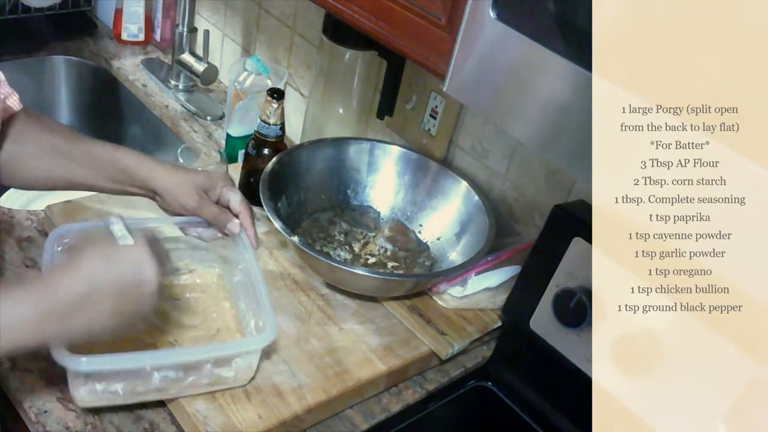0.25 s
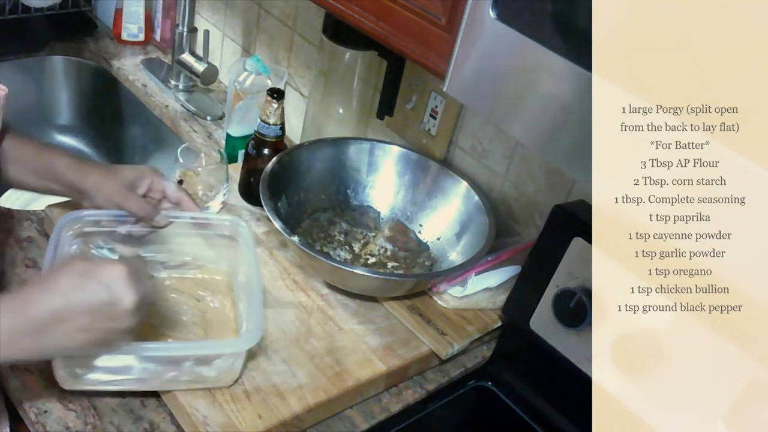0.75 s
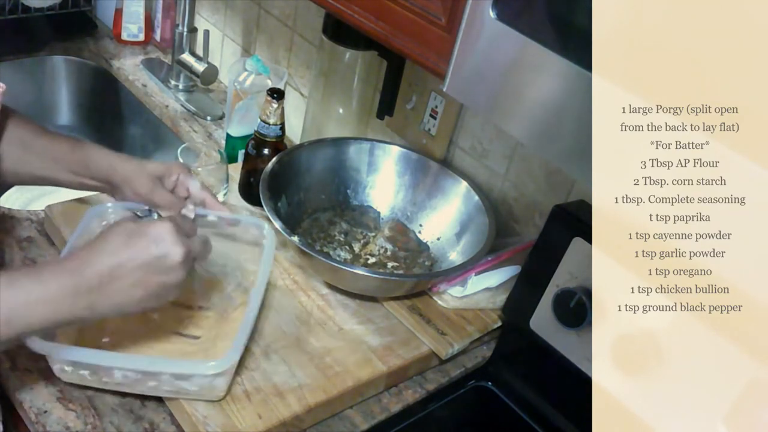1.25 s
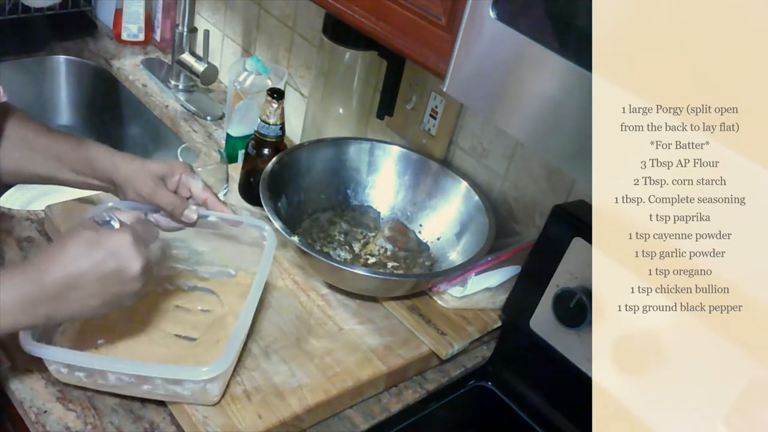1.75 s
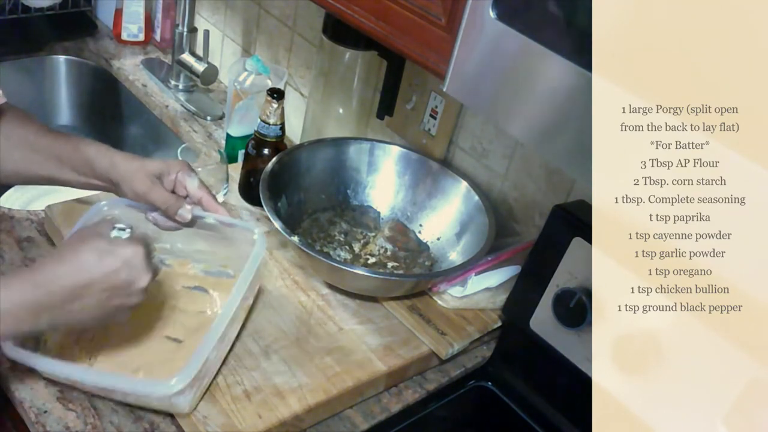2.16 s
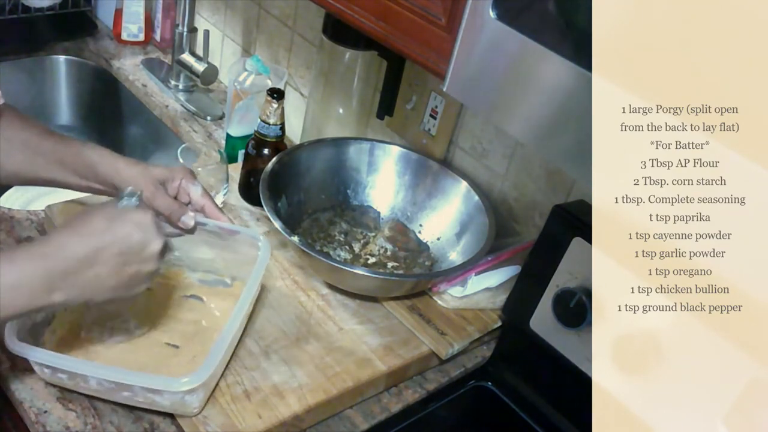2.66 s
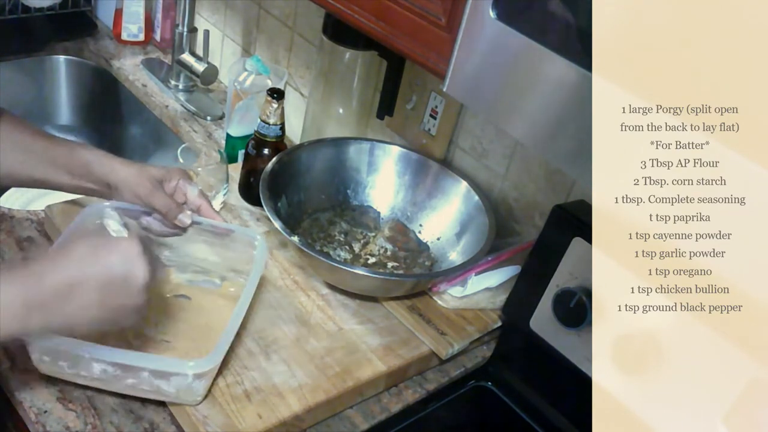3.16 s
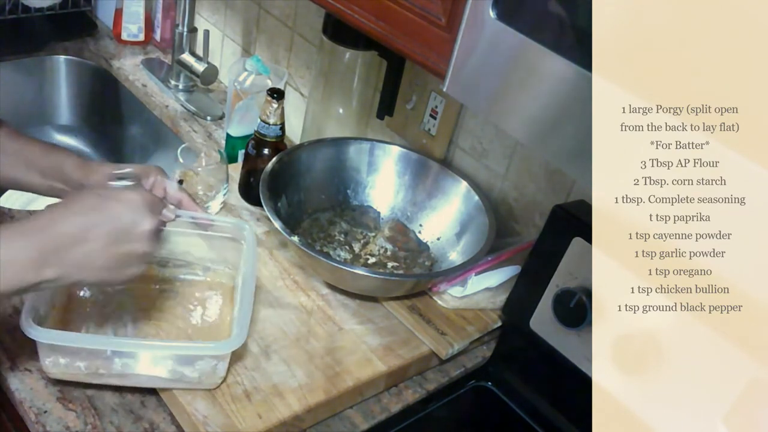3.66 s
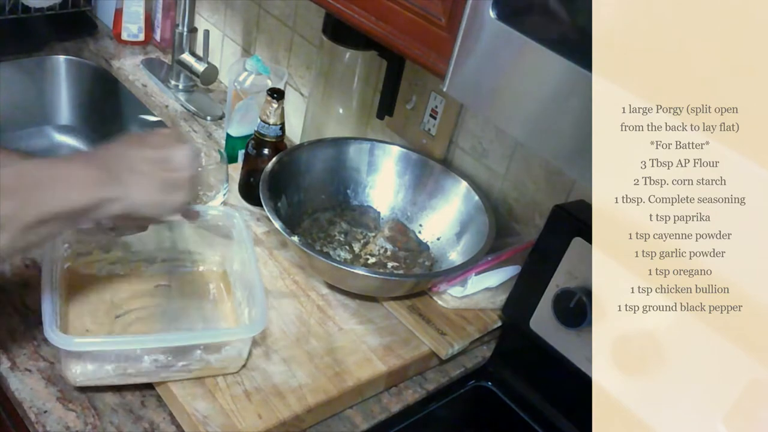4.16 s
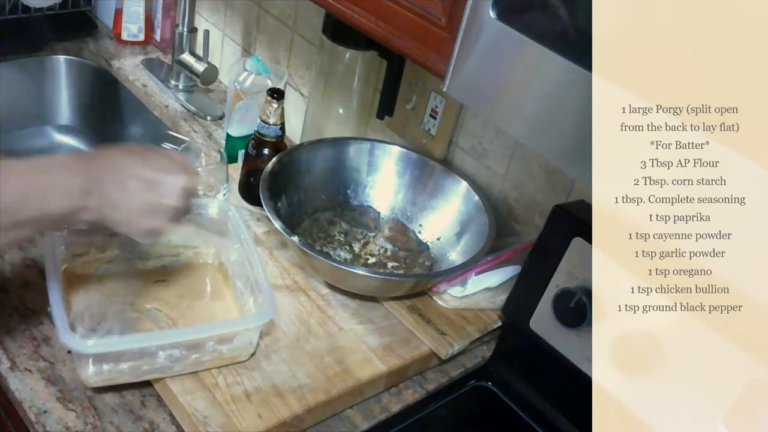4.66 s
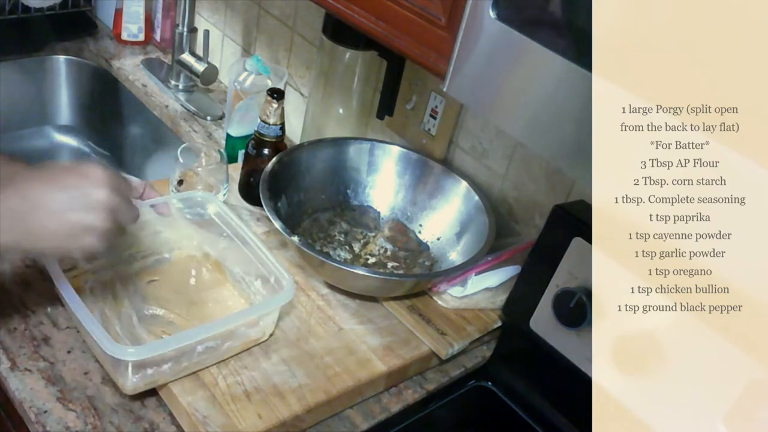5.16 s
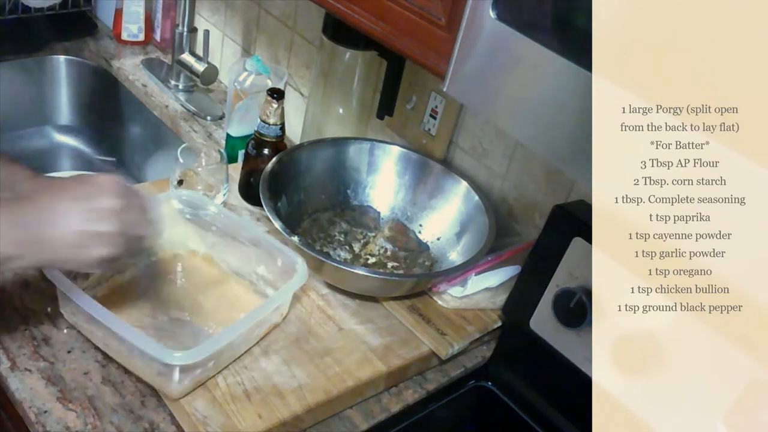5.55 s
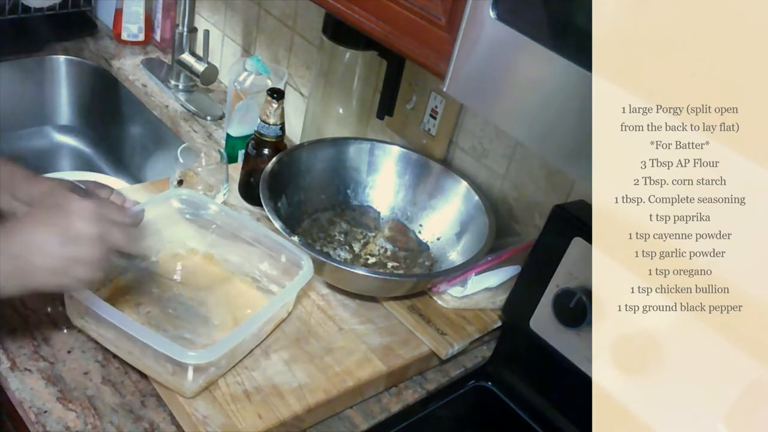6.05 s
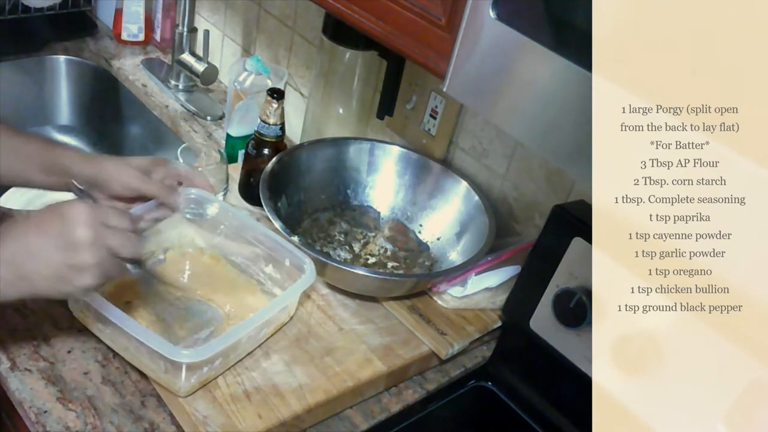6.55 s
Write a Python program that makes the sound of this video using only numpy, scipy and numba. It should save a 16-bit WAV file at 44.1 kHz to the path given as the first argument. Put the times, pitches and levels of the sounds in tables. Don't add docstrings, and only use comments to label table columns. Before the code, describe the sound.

A metal wire whisk beats thick wet batter in a thin plastic tub, heard very close in a small tiled kitchen with a steady low hum. From 0 to 1.8 s uneven hollow knocks come quickly, strong near 0.15, 0.97 and 1.35 s, with wire rattle, scraping, squelching and dull thumps of the tub on a wooden board. At about 1.87 s one very loud, sharp clack rings the plastic, with a rebound and another knock at 2.0 s. After a brief lull, firm double blows land near 2.5 s, and a wiry tick at 2.9 s. From 3 to 3.9 s it is quieter, mostly soft rubbing and small nudges. Hard clatters return at 4.37, 4.7, 4.87 and 5.1 s. From 5.3 s to about 6.8 s lighter taps, ticks and wet hissing swishes fade toward gentle stirring. Short hard-walled echo; bandlimited microphone, no high sparkle.

```python
import sys
import numpy as np
from scipy import signal
from scipy.fft import rfft, irfft, next_fast_len
from scipy.io import wavfile
from scipy.ndimage import uniform_filter1d
from numba import njit

SR = 44100
rng = np.random.default_rng(int(sys.argv[2]) if len(sys.argv) > 2 else 0)


def put_to_file(sound):
    columns = np.atleast_2d(sound).T
    safe = np.clip(columns, -1, 1)
    whole_steps = np.round(safe * 32767)
    wavfile.write(sys.argv[1], SR, whole_steps.astype(np.int16))


def convert_level_to_amplitude(level_db):
    exponent = np.asarray(level_db, float) / 20
    return 10 ** exponent


N = 300401


def level(x, db):
    return x * convert_level_to_amplitude(db) / np.sqrt(np.mean(x ** 2))


def coloured(x, shape):
    hz, db = np.transpose(shape)
    size = next_fast_len(len(x), real=True)
    f = np.fft.rfftfreq(size, 1 / SR) + 1
    gain = convert_level_to_amplitude(np.interp(np.log(f), np.log(hz), db, left=-80, right=-80))
    return level(irfft(rfft(x, size) * gain, size)[:len(x)], 0)


def walk(rate):
    k = int(SR / rate)
    steps = np.repeat(rng.standard_normal(N // k + 1), k)
    return 1.5 * uniform_filter1d(uniform_filter1d(steps, k), k)[:N]


def grains(rate, spread_db):
    clicks = rng.random(N) < rate / SR
    size = convert_level_to_amplitude(spread_db * np.minimum(rng.exponential(size=N), 3))
    return rng.standard_normal(N) * (0.16 + clicks * size)


def decay(t, t60):
    return np.exp(-np.log(1000) * t / t60)


def add(out, s, sound, peak_db):
    i = int(s * SR)
    out[i:i + len(sound)] += (sound * convert_level_to_amplitude(peak_db) / np.abs(sound).max())[:N - i]


@njit
def ring(force, hz, t60, gain):
    out = np.zeros(len(force))
    for m in range(len(hz)):
        p, z = np.exp(2j * np.pi * hz[m] / SR - np.log(1000) / (t60[m] * SR)), 0j
        for i in range(len(force)):
            z = z * p + force[i] + 1e-18
            out[i] += gain[m] * z.imag
    return out


# f/Hz, level/dB per Hz
ROOM_HUM = [(15, -24.5), (25, 0.5), (215, 2), (295, 7), (435, -5), (610, 0), (705, -18.5), (796, -4),
            (943, -5.5), (2610, -17), (4660, -30.5), (7200, -17.5), (8130, -53), (10600, -92),
            (17900, -120)]


def room_air():
    return coloured(rng.standard_normal(N), ROOM_HUM) * convert_level_to_amplitude(-55 + 0.5 * walk(2.0))


# t/s, effort/dB, wetness/dB
STIRRING = [(0, -47, -14.5), (.62, -55, -4), (1.209, -47, -13), (1.349, -39.5, -19.5),
            (1.521, -56.5, -11.5), (1.8, -40, -23.5), (2.05, -47, -4.5), (2.43, -61, -20.5),
            (2.85, -50.5, -8.5), (3.5, -53, -11.5), (3.9, -58.5, -6.5), (4.5, -48.5, -17),
            (4.8, -45, -18.5), (5.199, -49, -10), (5.5, -48, -11), (5.85, -51.5, -6), (6.2, -54, -4),
            (6.81, -57.5, -5)]
# f/Hz, level/dB, t60/s
TUB_MODES = [(120, -17, 0.26), (172, -17.5, 0.11), (214, -12, 0.36), (266, 3, 0.034), (301.8, -0.5, 0.16),
             (361.6, 0, 0.12), (408.3, -15.5, 0.44), (441, -5, 0.028), (491.5, -5.5, 0.29),
             (555.7, 0.5, 0.098), (612.7, 2.5, 0.14), (666.5, -2.5, 0.16), (763, 4.5, 0.039),
             (826, -2, 0.081), (889, -6, 0.066), (1002, -8.5, 0.14), (1101, -2.5, 0.12), (1188, -4, 0.084),
             (1140, -31.5, 0.1), (1373, -9.5, 0.077), (1500, -8.5, 0.093), (1608, -8, 0.024),
             (1814, -7, 0.016), (1970, -27.5, 0.03), (2120, -15.5, 0.029), (2395, -27.5, 0.077),
             (2590, -15, 0.04), (3020, -28, 0.13), (3354, -19, 0.039)]
# f/Hz, level/dB per Hz
SQUELCH_COLOUR = [(530, -37.5), (900, -10), (1060, 2.5), (1290, -2.5), (1960, -0.5), (3190, -5.5),
                  (4450, -13.5), (5500, -40), (7150, -55.5), (12100, -120)]
# f/Hz, level/dB per Hz
HISS_COLOUR = [(2940, -33.5), (5000, -8.5), (5900, -0.5), (7150, 10.5), (7680, 1.5), (8000, -30.5),
               (8130, -56), (10600, -38), (17900, -120)]


def stirring():
    wake_db, wake_s = -24.5, 0.015
    times, effort, wetness = np.transpose(STIRRING)
    now = np.arange(N) / SR
    wet_db = np.interp(now, times, wetness)
    drag = convert_level_to_amplitude(np.interp(now, times, effort))
    wake = np.exp(-np.arange(SR // 2) / SR / wake_s)
    for s, peak_db, *_ in all_blows():
        add(drag, s, wake, peak_db + wake_db)
    drag = uniform_filter1d(drag, SR // 200, origin=SR // 400 - 1)
    rub_db = 20 * np.log10(drag) - 1.5
    hiss_db = -57.5 + 0.87 * (rub_db + 53.5) + wet_db
    hz, db, t60 = np.transpose(TUB_MODES)
    surge = walk(15)
    rub = level(ring(grains(250, 5.75), hz, 1.0 * t60, convert_level_to_amplitude(db)), 0)
    rub = rub * convert_level_to_amplitude(rub_db + 1.02 * surge + 3.52 * walk(30))
    squelch = coloured(grains(900, 2.9), SQUELCH_COLOUR)
    squelch = squelch * convert_level_to_amplitude(rub_db + wet_db + 1.5 * surge + 2.5 * walk(35))
    hiss = coloured(grains(1500, 3.23), HISS_COLOUR) * convert_level_to_amplitude(hiss_db + 1.0 * surge + 2.0 * walk(45))
    return rub + squelch + hiss


# t/s, peak level/dB, f/Hz, t60/s
WIRE_PINGS = [(0.028, -48, 1420, 0.15), (0.56, -52, 1790, .1), (1.876, -12.5, 1122, 0.049),
              (1.877, -11.5, 469, 0.11), (1.877, -22.5, 2170, .04), (1.879, -23, 1400, .04),
              (1.95, -33, 1114, .07), (2.012, -20, 770, 0.098), (4.371, -22.5, 1196, 0.11),
              (4.4, -30, 1157, 0.14), (4.48, -48.5, 1130, 0.11), (4.312, -40, 775, 0.14),
              (.98, -20, 571, 0.14), (.842, -28, 517, .12), (4.866, -17.5, 713, 0.12),
              (5.571, -28.5, 705, .05), (.164, -15.5, 620, 0.042), (5.094, -18.5, 721, 0.055),
              (5.661, -25, 2010, 0.022), (3.078, -42, 1460, 0.091), (3.889, -54, 3240, 0.12),
              (5.208, -49, 1260, 0.067), (5.252, -40.5, 1220, 0.11), (5.41, -51.5, 2620, 0.076),
              (5.502, -48, 3390, .08), (5.788, -47, 2830, 0.054), (5.831, -47, 3150, .1),
              (5.846, -44.5, 3110, 0.089), (5.85, -51, 2120, 0.078), (6.077, -45.5, 2867, .1),
              (6.108, -52, 2680, .1)]


def pings():
    warble, rough_db = 0.03, 3.5
    out, t = np.zeros(N), np.arange(SR // 6) / SR
    wander = walk(120)
    bend = 1 + warble * wander
    for s, peak_db, hz, t60 in WIRE_PINGS:
        i = int(s * SR)
        turns = np.cumsum(hz * bend[i:][:len(t)]) / SR
        rough = convert_level_to_amplitude(rough_db * wander[::-1][i:][:len(t)])
        shape = (1 - np.exp(-t / 0.00095)) * decay(t, t60)
        add(out, s, rough * np.sin(2 * np.pi * turns) * shape, peak_db)
    return out


# t/s, peak level/dB, thud below 400 Hz/dB, upper wall modes/dB, bright edge/dB
HARD_KNOCKS = [(0.107, -17, -19, -5.5, -51), (0.164, -12.5, 3, 14.5, -15), (0.525, -22.5, -9, 0, 8.5),
               (0.837, -22.5, -16, -18, -5.5), (0.964, -11, -5, -16, -14), (1.052, -14.5, 13, 8.5, -17),
               (1.324, -14.5, -1, 7, -24), (1.35, -16.5, -1, 1, -28), (1.384, -17.5, -19.5, 12, -16),
               (1.676, -15, -4, -13, -20), (1.769, -22.5, -5, -3, -31.5), (1.874, 3.5, -21, -1.5, -27.5),
               (2.012, -12, -5.5, -7, 0.5), (2.506, -9.5, -7, -11, -20.5), (2.572, -14, -9, -4, -16),
               (2.844, -20, -2, -5, -5), (3.955, -22, -3, -3, -10), (4.369, -12.5, -9, 9, -19),
               (4.688, -11.5, -13.5, -12, -18), (4.866, -10.5, -7.5, 7.5, -18),
               (5.094, -11, -9.5, -10, -36), (5.571, -22.5, -23, -22, -42), (5.654, -23.5, -11, 9, 6),
               (5.661, -27.5, -24, -3, 20), (5.804, -27, -17, -13, -24)]
# t/s, peak level/dB, thud/dB, bright edge/dB
LIGHT_TAPS = [(0.316, -24, -8, -6), (0.608, -27.5, -12, -14), (0.636, -24, -16, -11.5),
              (0.788, -25, 6.5, -14), (1.063, -16.5, -10, -24), (1.107, -19.5, -32, -9.5),
              (1.272, -23.5, 1, -34), (1.459, -29.5, -18, -7), (1.506, -28.5, 7, -13),
              (1.745, -25.5, -2, -11), (1.827, -21.5, -9, -22.5), (2.778, -35, 7, -23.5),
              (2.887, -21.5, -22, -7), (3.07, -36, -22, -8), (3.33, -42.5, -17, -33), (3.427, -28.5, -5, 1),
              (4.14, -28, -11, -30), (4.291, -29.5, -17, -9), (4.629, -30.5, -3, -32),
              (4.801, -30, -18, -31), (5.331, -25.5, 10, -3.5), (5.344, -24, -9, -7),
              (5.614, -28.5, -1, -22), (5.761, -33.5, -5, -4), (5.999, -28.5, -11, -4),
              (6.076, -29, 2, 4.5), (6.213, -29, -1, 3.5), (6.411, -24.5, 0, 0.5), (6.504, -27, -1.5, -1),
              (6.698, -33, 4, -15)]
# t/s, peak level/dB
TUB_NUDGES = [(0.029, -47), (0.245, -35), (0.487, -49), (0.7, -41), (1.222, -37), (2.308, -29.5),
              (2.353, -30), (3.282, -38.5), (3.487, -37), (3.545, -37), (3.642, -35.5), (3.726, -37),
              (4.537, -40.5), (5.251, -42.5), (5.453, -43), (5.895, -52), (6.271, -34), (6.597, -58),
              (6.779, -40)]
# t/s, peak level/dB, thud/dB, upper wall modes/dB
WIRE_REBOUNDS = [(.175, -11.5, -6, 8), (.195, -17.5, -5, 3.5), (.215, -31.5, -4, -6), (.351, -33, -4, 1),
                 (.982, -10.5, 1.5, -2), (1.285, -27, -15, -6), (1.362, -18.5, -9.5, 9),
                 (1.684, -15.5, -10, -5), (1.885, -5.5, -15.5, -4), (1.905, -17, -21, -15),
                 (1.924, -34, -10, -6), (1.945, -23, -8, 0), (2.022, -15, -10, -4),
                 (2.032, -15.5, -11.5, -2), (2.518, -14, -11, 5), (2.53, -18.5, -21, -7),
                 (2.584, -15, -6, -2.5), (2.678, -29.5, -19, -17), (2.716, -51.5, -8, -12),
                 (2.854, -22, -9.5, -4), (3.085, -32, -17, 0), (3.51, -36, -4, -3), (4.05, -37, -8, -4),
                 (4.385, -20, -16, 2), (4.41, -23, -11, 4), (4.695, -11, -24, -9), (4.71, -22.5, -20, 1),
                 (4.735, -27.5, -5, -9), (4.762, -32, -5, -7.5), (4.845, -29.5, -11.5, -8),
                 (4.886, -16.5, -26, 11.5), (4.949, -24.5, -22, 4), (5.118, -29.5, -7, -6),
                 (5.138, -25, -19, -7), (5.396, -35.5, -1, -6), (5.518, -36, -20, -3), (5.588, -37, -7, 0),
                 (5.734, -41, -13, -7), (5.853, -35.5, -12, -3), (6.095, -30, -16, -11.5)]


def all_blows():
    taps = [(s, db, thud, -6.5, edge) for s, db, thud, edge in LIGHT_TAPS]
    nudges = [(s, db, -3.5, -7.5, -17) for s, db in TUB_NUDGES]
    rebounds = [(*row, -12) for row in WIRE_REBOUNDS]
    return HARD_KNOCKS + taps + nudges + rebounds


BLOW_COLOUR_HZ = (150, 290, 600, 1000, 1230, 1900)


def blows(wires=12, spot_db=2.5, drift=0.025, boost_db=-2.0, damping=0.72):
    clatter_s, rebound_share = 0.024, 0.3402
    contact_s, cushion_s = 0.00015, 0.00007
    swell = 0.14
    rattle_db, rattle_s = 3.5, 0.005
    evenness = 0.75
    out, hits = np.zeros(N), all_blows()
    hz, db, t60 = np.transpose(TUB_MODES)
    luck = rng.random((len(hits), 2, wires))
    spots = rng.standard_normal((len(hits), 2, len(hz)))
    spans = np.full(len(hits), clatter_s)
    spans[-len(WIRE_REBOUNDS):] *= rebound_share
    rattle = rattle_db * np.array([walk(1 / rattle_s) for _ in range(2)])
    fade = np.minimum(np.linspace(4, 0, SR // 7), 1)
    for hit, (when, size), (gain, bend), span in zip(hits, luck, spots, spans):
        s, peak_db, thud, upper, edge = hit
        force = np.zeros(SR // 7)
        when = np.sort(when) - when.min()
        push = (0.5 + size) * np.exp(-2.5 * when) * (1 - 0.31 * np.exp(-when / swell))
        np.add.at(force, (span * SR * when).astype(int), push)
        spectrum = np.abs(rfft(force, SR // 5))
        luck_db = 20 * np.log10(spectrum[(hz / 5).astype(int)] / np.linalg.norm(force))
        for soft_s in (contact_s, cushion_s):
            force = signal.lfilter([1], [1, -np.exp(-1 / (soft_s * SR))], force)
        board_db = -0.5 - 0.95 * (peak_db + 21.0)
        corners_db = (thud + 6 + board_db, thud + 5, 0, upper + 5, upper + 4, edge + 24)
        colour = np.interp(np.log(hz), np.log(BLOW_COLOUR_HZ), corners_db)
        mode_db = db + colour + spot_db * gain - evenness * np.maximum(luck_db, -7)
        modes = np.array([hz * (1 + drift * bend), damping * t60, convert_level_to_amplitude(mode_db) * np.sign(bend)])
        sound = np.zeros(len(force))
        for k in range(2):
            chatter = convert_level_to_amplitude(np.resize(rattle[k, int(s * SR):], len(force)))
            sound += ring(force, *modes[:, k::2].copy()) * chatter
        add(out, s, sound * fade, peak_db + boost_db)
    return signal.sosfilt(signal.butter(3, 125., "high", fs=SR, output="sos"), out)


# t/s, peak level/dB, centre f/Hz, top-band share/dB
WIRE_TICKS = [(0.065, -30.5, 1580, -9), (0.142, -29, 1540, -8.5), (0.2028, -29, 1540, -16.5),
              (0.33, -21, 2210, -13.5), (0.605, -33.5, 2750, -24), (0.8186, -19.5, 1920, -23.5),
              (1.1058, -29, 1770, -22.5), (1.2565, -28, 1930, -12.5), (1.282, -26.5, 2730, -23),
              (1.3794, -31.5, 1500, -12), (1.4256, -24.5, 2830, -21.5), (1.4622, -21.5, 1740, -26.5),
              (1.8358, -15, 2270, -13.5), (2.359, -26.5, 1760, -3.5), (2.8195, -32.5, 1580, -4),
              (2.8914, -15.5, 1500, -6.5), (3.2216, -32.5, 2630, -28), (3.4035, -39.5, 2320, -1),
              (3.888, -40, 3180, -8), (4.0278, -32.5, 1730, -10), (4.052, -26.5, 1620, -9),
              (4.6472, -26, 1970, -11.5), (4.9462, -31, 1630, -11), (5.0582, -26.5, 1720, -27),
              (5.129, -31, 1950, -18.5), (5.2076, -24, 1510, -13), (5.5044, -32.5, 1905, -9.5),
              (5.8436, -28, 2230, -30), (5.9222, -23, 1700, -6), (6.4245, -21, 1740, -14.5)]


def ticks(width=0.25, top_hz=7100, boost_db=-15.5):
    out, t = np.zeros(N), np.arange(SR // 12) / SR
    contacts = [(s, db + edge - 4.5, 1710, -22) for s, db, _, _, edge in all_blows()]
    rows = WIRE_TICKS + contacts
    noises = rng.standard_normal((len(rows), 3, len(t)))
    shape = decay(t, 0.084) * (1 - np.exp(-t / 0.00089))
    for (s, peak_db, hz, top_db), (a, b, c) in zip(rows, noises):
        burst = shape * convert_level_to_amplitude(3.2 * c)
        body = signal.lfilter(*signal.iirpeak(hz, 1 / width, fs=SR), a * burst)
        top = signal.lfilter(*signal.iirpeak(top_hz, 5.5, fs=SR), b * burst)
        add(out, s, body, peak_db + boost_db)
        add(out, s, top, peak_db + top_db + boost_db)
    return signal.sosfilt(signal.butter(4, 7700., fs=SR, output="sos"), out)


# t/s, length/s, level/dB
BATTER_SWISHES = [(0.053, 0.016, -45), (0.162, 0.071, -65), (0.251, 0.14, -51.5), (0.509, 0.053, -45),
                  (0.627, 0.069, -56), (0.783, 0.085, -52.5), (0.952, 0.044, -58), (1.098, 0.039, -57),
                  (1.13, 0.029, -53), (1.246, 0.067, -47), (1.83, 0.15, -55), (1.99, 0.067, -46),
                  (2.558, 0.029, -54), (2.657, 0.058, -52.5), (2.815, 0.022, -52), (2.898, 0.041, -50),
                  (3.39, 0.09, -49.5), (4.013, 0.037, -49.5), (4.548, 0.11, -53), (4.734, 0.037, -51.5),
                  (4.859, 0.028, -55), (4.935, 0.028, -56), (5.033, 0.073, -48), (5.127, 0.042, -48),
                  (5.199, 0.046, -49.5), (5.649, 0.049, -44), (5.751, 0.13, -53.5), (5.904, 0.056, -47),
                  (5.981, 0.042, -53), (6.156, 0.035, -57), (6.195, 0.1, -47), (6.4, 0.075, -51)]


def swishes():
    rise_s, fall_s = 0.0084, 0.019
    gain, t = np.zeros(N), np.arange(SR // 4) / SR
    for s, length, db in BATTER_SWISHES:
        fall = np.exp(-np.maximum(t - length / 2, 0) / fall_s)
        add(gain, s, (1 - np.exp(-t / rise_s)) * fall, db - 5.5)
    return gain * coloured(grains(1500, 2.5), HISS_COLOUR) * convert_level_to_amplitude(3.77 * walk(60))


# t/s, peak level/dB, f/Hz
FLOOR_THUMPS = [(0.165, -14.5, 365.4), (0.355, -29, 289), (0.555, -34, 290), (0.669, -31.5, 300),
                (0.84, -20.5, 308), (0.974, -18.5, 357), (1.06, -19, 292), (1.274, -23, 268),
                (1.681, -19, 172), (1.765, -21, 317), (1.83, -26, 322), (1.875, -36, 322),
                (2.508, -12, 332), (2.576, -49.5, 233), (2.776, -35, 311), (3.328, -31, 311),
                (3.963, -25, 290), (4.371, -19.5, 129), (4.694, -18.5, 279), (4.801, -23.5, 271),
                (5.097, -21.5, 291), (5.344, -24.5, 311), (5.581, -22.5, 294), (5.811, -18.5, 308),
                (5.999, -33, 304), (6.074, -31, 304), (6.137, -34.5, 308), (6.215, -29, 307),
                (6.417, -42, 287), (6.788, -33.5, 297), (0.611, -31, 295), (.64, -28, 654),
                (1.324, -17, 302), (1.349, -16.5, 333), (4.288, -34, 670), (5.804, -27, 650),
                (6.41, -30.5, 428), (6.27, -36.5, 652), (5.096, -19, 371.5), (1.742, -25, 607),
                (1.676, -20, 633)]
# t/s, peak level/dB, f/Hz
BOARD_THUMPS = [(0.164, -22, 137), (0.975, -26.5, 136), (1.876, -28, 167), (2.507, -27.5, 183),
                (2.575, -26.5, 126), (4.693, -19.5, 182), (5.094, -18.5, 198)]


def thumps():
    out, t = np.zeros(N), np.arange(SR // 6) / SR
    shape = (1 - np.exp(-t / 0.006)) * decay(t, 0.075)
    for s, peak_db, hz in FLOOR_THUMPS + BOARD_THUMPS:
        add(out, s, shape * np.sin(2 * np.pi * hz * t), peak_db - 6.5)
    return out


# t/s, length/s, level/dB, centre f/Hz
WALL_SCRAPES = [(0.2, 0.12, -44, 910), (0.33, 0.049, -49, 1250), (0.83, 0.082, -40.5, 920),
                (0.97, 0.038, -35.5, 1180), (1.0745, 0.095, -37.5, 1150), (1.148, 0.04, -48.5, 940),
                (1.344, 0.074, -33.5, 920), (1.425, 0.11, -42, 760), (1.877, 0.019, -14.5, 990),
                (1.38, 0.013, -32, 810), (1.47, 0.013, -39.5, 1260), (5.8, 0.014, -36, 1910),
                (0.54, 0.013, -37, 2130), (0.7, 0.034, -40.5, 660), (2.015, 0.043, -33.5, 804),
                (3.475, 0.045, -47, 540), (4.363, 0.023, -31.5, 1130), (1.938, 0.045, -43, 1190),
                (2.04, 0.13, -43.5, 1130), (2.528, 0.06, -40.5, 890), (2.6, 0.079, -53, 886),
                (2.87, 0.064, -40, 750), (2.915, 0.046, -41, 1130), (4.437, 0.068, -54.5, 920),
                (4.86, 0.1, -37, 830), (5.114, 0.044, -32, 736), (5.6, 0.045, -36, 710),
                (5.61, 0.034, -50, 1730), (5.81, 0.16, -53, 2310), (6.071, 0.069, -54.5, 2080),
                (2.826, 0.018, -48, 2900), (2.8, 0.032, -36.5, 460), (1.37, .03, -35, 910),
                (6.415, .03, -44.5, 1700), (6.499, 0.024, -47.5, 1100), (1.895, .04, -29, 420),
                (6.325, 0.018, -53, 1730), (2.65, 0.015, -40.5, 1330), (5.575, 0.045, -46.5, 1200),
                (.168, 0.043, -43, 1740), (2.9, 0.02, -45, 2000), (1.2, 0.0095, -49.5, 2600)]


def scrapes(width=0.66, fall_s=0.011):
    out, t = np.zeros(N), np.arange(SR // 4) / SR
    slips = grains(1800, 2.6) * convert_level_to_amplitude(2.0 * walk(90))
    for s, length, db, hz in WALL_SCRAPES:
        edges = (hz / (1 + width / 2), hz * (1 + width / 2))
        band = signal.butter(2, edges, "band", fs=SR, output="sos")
        shape = (1 - np.exp(-t / 0.0026)) * np.exp(-np.maximum(t - length / 2, 0) / fall_s)
        i = int(s * SR)
        out[i:i + len(t)] += level(signal.sosfilt(band, slips[i:i + len(t)]), db) * shape
    return out


# f/Hz, t60/s
KITCHEN_T60 = [(100, 0.13), (500, 0.45), (1500, 0.33), (4000, 0.42), (8000, 0.05)]


def kitchen(x, gap_s=0.0052):
    t, tail = np.arange(SR // 2) / SR, 0
    hz, t60s = np.transpose(KITCHEN_T60)
    for centre in 88 * 2. ** np.arange(7):
        edges = (centre / np.sqrt(2), centre * np.sqrt(2))
        band = signal.butter(2, edges, "band", fs=SR, output="sos")
        t60 = np.interp(np.log(centre), np.log(hz), t60s)
        echoes = signal.sosfilt(band, rng.standard_normal(len(t)))
        tail = tail + echoes * decay(t, t60) * np.sqrt(np.log(1000) / t60 / SR)
    tail = tail * np.clip(t / gap_s - 1, 0, 1)
    return signal.fftconvolve(x, tail)[:N] * convert_level_to_amplitude(-6)


def scene():
    near = blows() + thumps() + ticks() + pings() + scrapes() + swishes() + stirring()
    near = signal.sosfilt(signal.butter(4, 105., "high", fs=SR, output="sos"), near)
    return (near + kitchen(near) + room_air())[None]


# t/s, length/s, thinned above f/Hz
THIN_MOMENTS = [(.36, 0.018, 2000), (0.682, 0.016, 2000), (1.361, 0.017, 2300), (1.655, .02, 2000),
                (2.319, 0.016, 2200), (4.435, .013, 2600), (4.476, .017, 2400), (4.629, .016, 1800),
                (5.012, 0.017, 2000), (5.484, .016, 1500), (5.845, .009, 1500), (5.929, 0.016, 800),
                (6.162, .052, 800), (6.463, 0.012, 1500)]


def thin_treble(x):
    kept_share, lift = 0.028, 1 - convert_level_to_amplitude(6)
    for s, length, above_hz in THIN_MOMENTS:
        part = slice(int((s - .06) * SR), int((s + .06) * SR))
        high = signal.butter(8, above_hz, "high", fs=SR, output="sos")
        treble = signal.sosfiltfilt(high, x[0, part])
        lines = signal.stft(treble, nperseg=1024)[2]
        size = np.abs(lines)
        is_weak = size < np.quantile(size, 1 - kept_share, axis=0)
        weak = signal.istft(lines * np.where(is_weak, 1, lift), nperseg=1024)[1][:len(treble)]
        t = np.arange(part.start, part.stop) / SR - s
        x[0, part] -= weak * np.clip((length / 2 - np.abs(t)) / .011 + .55, 0, 1)
    return x


def top_cut(x):
    return signal.sosfilt(signal.butter(12, 8280, fs=SR, output="sos"), x)


def record(dry):
    top = signal.ellip(10, .2, 80, 8250, fs=SR, output="sos")
    x = 1.3 * np.tanh(.92 * dry)
    x = signal.sosfilt(top, signal.sosfilt(top, x))
    x = signal.sosfilt(signal.butter(2, 24., "high", fs=SR, output="sos"), x)
    return top_cut(thin_treble(x))


dry = scene()
out = record(dry)
put_to_file(out)
```